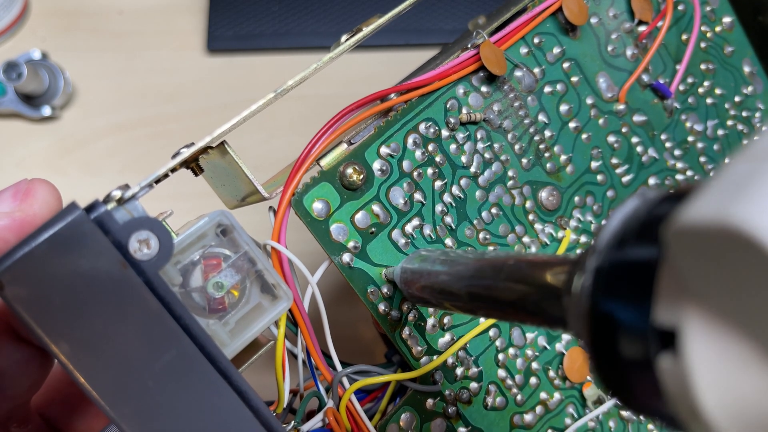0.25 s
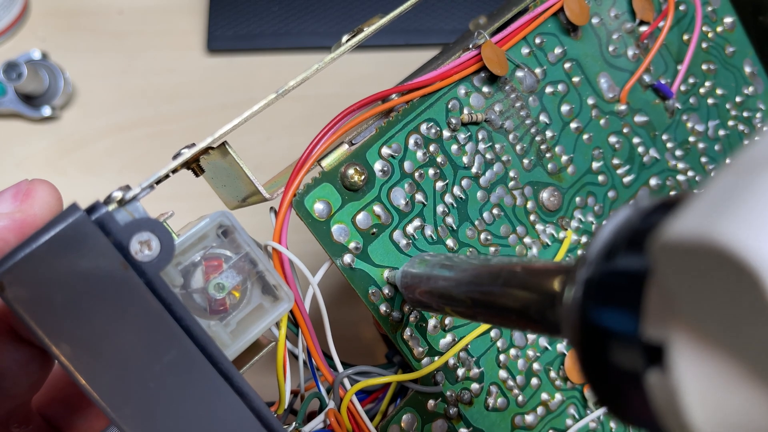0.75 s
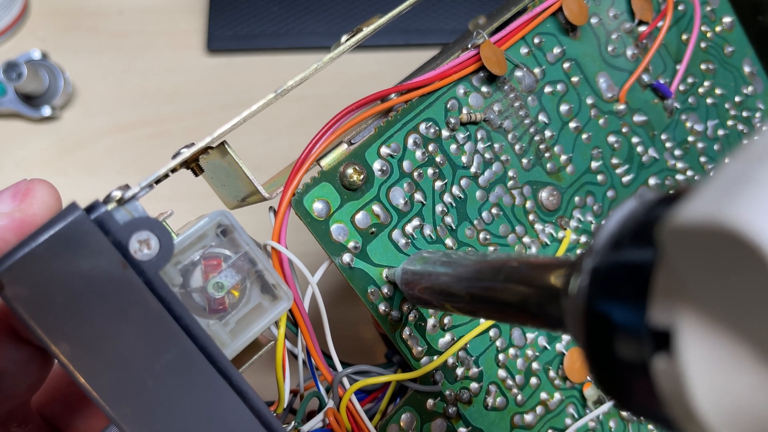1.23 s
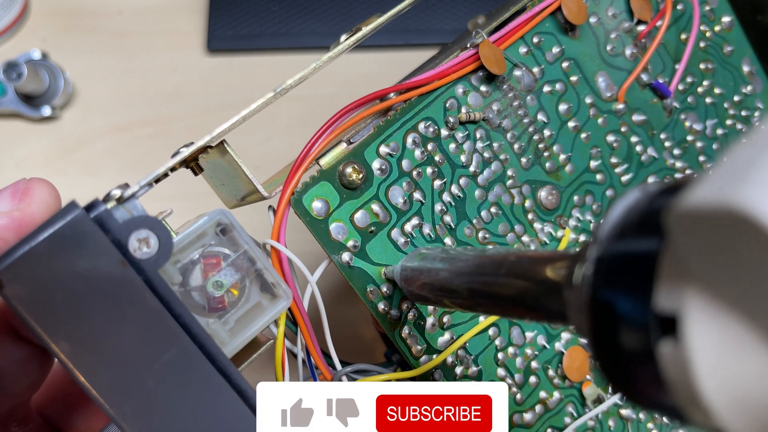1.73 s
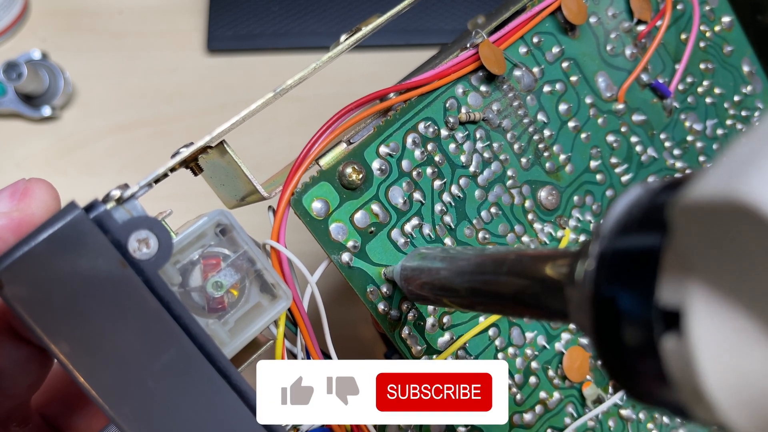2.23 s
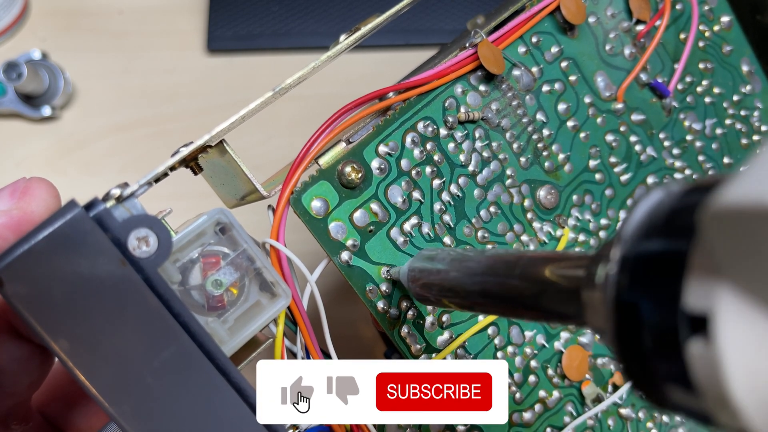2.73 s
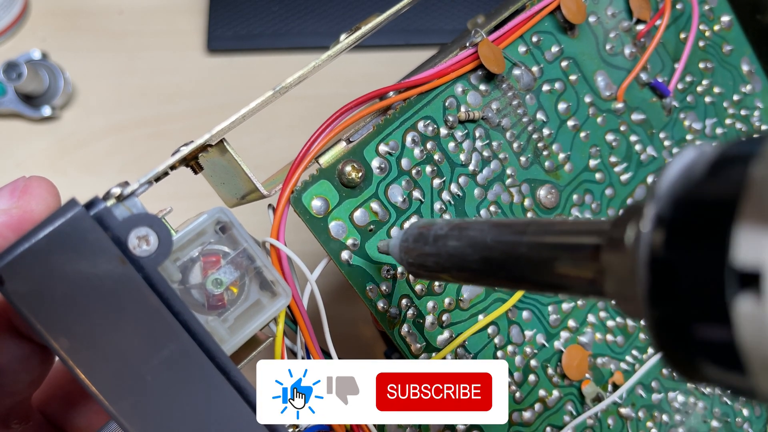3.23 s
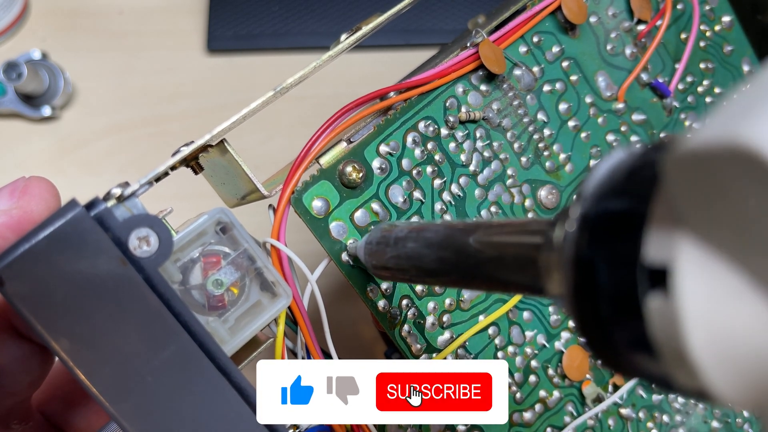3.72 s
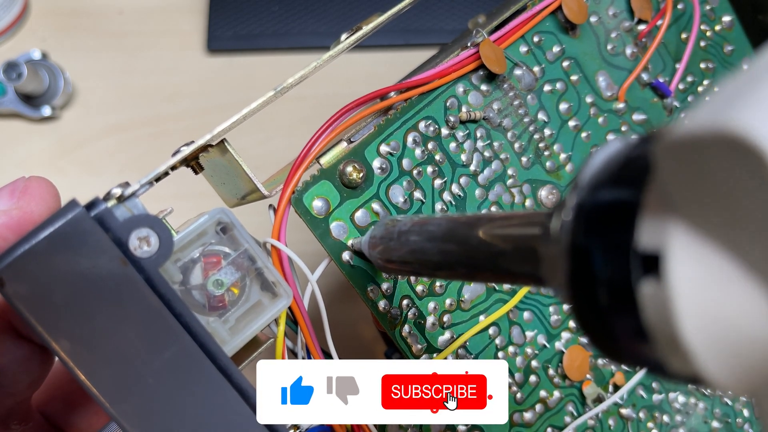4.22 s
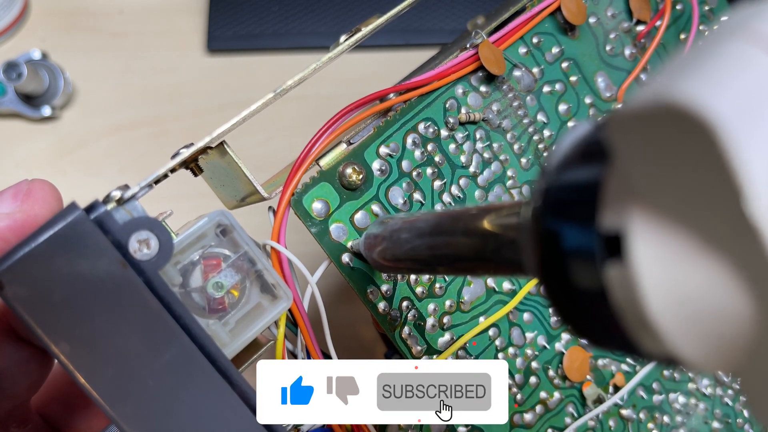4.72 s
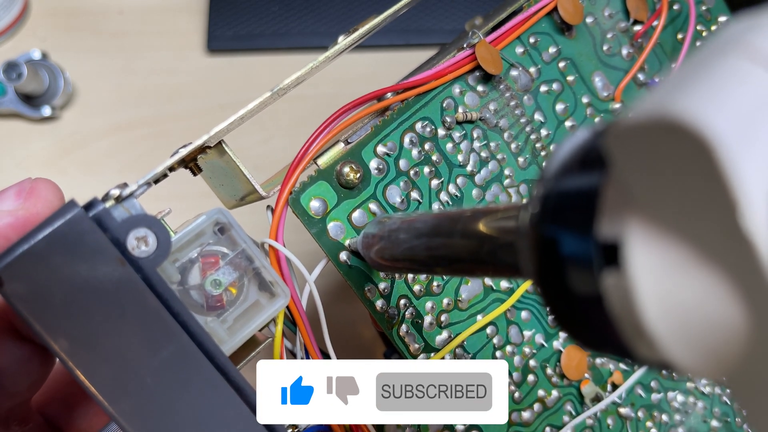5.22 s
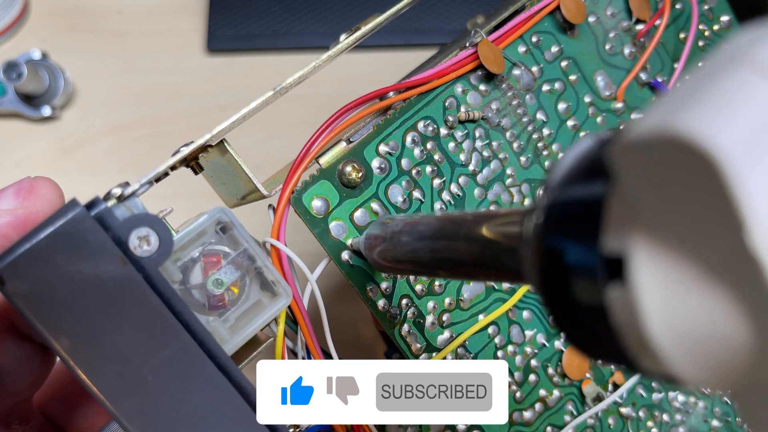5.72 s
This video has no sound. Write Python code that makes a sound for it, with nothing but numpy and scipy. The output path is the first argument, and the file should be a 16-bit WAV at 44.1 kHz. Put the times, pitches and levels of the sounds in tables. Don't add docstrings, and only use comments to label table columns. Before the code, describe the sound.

Close microphone at a workbench in a quiet, ventilated small room. A hot metal tip ticks and bumps a circuit board, then a plastic trigger clicks and a small diaphragm pump spins up, buzzing and sucking air with a whistly hiss. A louder click releases it and it quickly coasts down. Later the board clatters with rattling loose parts, more ticks follow, and flux fizzes faintly.

```python
import sys
import numpy as np
from scipy import signal
from scipy.fft import rfft, irfft
from scipy.io import wavfile

SR = 44100
rng = np.random.default_rng(int(sys.argv[2]) if len(sys.argv) > 2 else 0)


def to_wav(s):
    ch = np.atleast_2d(s).T
    pcm = np.round(np.clip(ch, -1, 1) * 32767)
    wavfile.write(sys.argv[1], SR, pcm.astype(np.int16))


def elevation(decibels):
    levels = np.asarray(decibels, float)
    return 10 ** (levels / 20)


N = 262703
BURST_N = int(0.3 * SR)


def rms_one(x):
    return x / np.sqrt(np.mean(x ** 2) + 1e-20)


def curve(rows):
    return np.interp(np.arange(N) / SR, *np.transpose(rows))


def coloured(spectrum):
    hz, db = np.transpose(spectrum)
    bins = np.maximum(np.fft.rfftfreq(N, 1 / SR), 1)
    shape = elevation(np.interp(np.log(bins), np.log(hz), db, -90, -90))
    return rms_one(irfft(rfft(rng.standard_normal(N)) * shape, N))


def drift(rate_hz):
    r = np.exp(-2 * np.pi * rate_hz / SR)
    wander = signal.lfilter([1], [1, -2 * r, r * r], rng.standard_normal(N + SR))
    return rms_one(wander[SR:])


def resonate(x, hz, width):
    r = np.exp(-np.pi * width / SR)
    poles = [1, -2 * r * np.cos(2 * np.pi * hz / SR), r * r]
    return signal.lfilter([(1 - r * r) / 2, 0, (r * r - 1) / 2], poles, x)


def ring(strikes, hz, t60):
    r, w = elevation(-60 / (t60 * SR)), 2 * np.pi * hz / SR
    return signal.lfilter([0, np.sin(w)], [1, -2 * r * np.cos(w), r * r], strikes + 1e-18)


def high(x, hz):
    return signal.sosfilt(signal.butter(4, hz, "high", fs=SR, output="sos"), x)


def add(out, s, sound):
    i = int(s * SR)
    out[i:i + len(sound)] += sound[:N - i]


def fade(t60, rise):
    t = np.arange(BURST_N) / SR
    return (1 - np.exp(-t / rise)) * elevation(-60 * t / t60)


def gate(edges_s, depth_db=30):
    return np.interp(np.arange(N) / SR, np.sort(edges_s), [-depth_db, 0, 0, -depth_db], -150, -150)


def swells(rows):
    t = np.arange(N) / SR
    return sum(elevation(db) * np.exp(-((t - middle) / half) ** 4) for middle, half, db in rows)


# [Hz, dB per Hz]
HUSH = [(8.8, -34), (15, 3), (25, -7.5), (59, -16), (109, -18), (130, -12.5), (150, -22.5), (240, -18),
        (442, -19.5), (705, -28), (1790, -30.5), (1960, -30), (2780, -35.5), (7720, -45), (16000, -48)]
# [Hz, dB, Hz]
DUCT = [(328.5, -67.5, 13), (245.2, -71.5, 16), (380.1, -68.5, 31), (187.1, -68.5, 17.6), (2024, -78, 37),
        (1082, -78.5, 76)]
# [s, dB]
HANDLING = [(0, 0.5), (1.0, 3.5), (1.4, 0.6), (3.0, -1.5), (4.2, -0.4), (4.6, 1.45), (5.96, 2.54)]
# [s, s, dB]
SHOVES = [(0.48, 0.071, -45), (0.68, 0.073, -45.5), (1.0, 0.19, -46), (1.76, 0.13, -44.5),
          (2.22, 0.22, -43.5), (2.9, 0.12, -48.5), (3.2, 0.16, -59), (4.12, 0.065, -54), (4.75, 0.071, -46),
          (5.82, 0.1, -48)]


def room_tone():
    blade_hz = 117 * (1 + 0.0129 * drift(3.37))
    blade = elevation(-64 + 0.56 * drift(3.3)) * np.sin(2 * np.pi * np.cumsum(blade_hz) / SR)
    white = rng.standard_normal(N)
    duct = sum(elevation(db) * rms_one(resonate(resonate(white, hz, width), hz, width)) for hz, db, width in DUCT)
    hush = elevation(-56) * coloured(HUSH)
    steady = high(hush, hz=5000)
    handled = elevation(curve(HANDLING)) * high(hush - steady, hz=11.7)
    bench = elevation(-3.0) * coloured([(5, 0.5), (14, 5.5), (32, -17.0), (60, -39.5)])
    rumble = (elevation(-62) + swells(SHOVES)) * bench
    return blade + duct + steady + handled + rumble


# [s, dB, Hz, dB, s]
TICKS = [(0.2886, -38, 2880, -5.5, 0.023), (0.405, -50.5, 7500, 4, 0.0075), (0.497, -34, 5000, -12, 0.011),
         (0.518, -48, 14500, -13, .01), (0.943, -42.5, 10700, -15, 0.0092), (1.024, -47, 7650, -12, .015),
         (1.241, -59, 5000, -6, .015), (2.958, -54, 3260, -1, 0.021), (4.521, -51, 5750, -2, 0.013),
         (5.121, -44, 6800, -15, .012)]


def tip_ticks():
    out = np.zeros(N)
    t = np.arange(BURST_N) / SR
    for s, peak_db, hz, share_db, t60 in TICKS:
        scrape = resonate(rng.standard_normal(BURST_N), hz=7450, width=11000)
        crack = fade(0.027, 0.00019) * high(scrape, hz=1800)
        tone = fade(t60, 0.000091) * np.sin(2 * np.pi * hz * t)
        add(out, s, elevation(peak_db) * (0.32 * crack + elevation(share_db) * tone))
    return out


# [s, dB, dB, Hz]
KNOCKS = [(0.389, -48.5, -49, 940), (0.528, -51, -43, 990), (0.616, -54, -44.5, 1980),
          (4.52, -42, -62, 1390), (4.659, -48, -43, 1900), (4.682, -35, -33, 940), (4.693, -49, -41, 1300),
          (4.701, -30.5, -27, 920), (4.708, -50, -34, 3300), (4.713, -37, -32, 1190),
          (4.729, -45, -32.5, 4120), (4.744, -48, -37, 3100), (4.776, -48, -36, 940),
          (4.792, -58, -42, 1300), (4.805, -60, -40, 1180), (5.121, -43, -57, 2050),
          (5.27, -39.5, -48.5, 1480), (5.297, -52, -42.5, 1800)]
# [Hz, dB, s]
BOARD = [(146.4, -5.5, 0.16), (211, 0.5, 0.095), (235, 2.5, 0.097), (326, 10.5, 0.085), (383, -16, 0.067),
         (532, 4.5, 0.032), (784, 6.5, 0.051)]
# [Hz, dB per Hz]
RATTLE = [(400, -49), (700, -1), (1030, 8), (1450, 3.5), (2000, 1), (2600, -3), (3270, 1.5), (4400, -5.5),
          (4750, -14), (9930, -17), (15000, -46)]


def knocks():
    out = np.zeros(N)
    rattle = coloured(RATTLE) * elevation(3.5 * drift(200))
    push = fade(0.013, 0.00048)
    push = push / push.sum()
    for s, rattle_db, thud_db, part_hz in KNOCKS:
        share = elevation(rng.normal(0, 2, len(BOARD))) * rng.choice([-1, 1], len(BOARD))
        thud = sum(g * elevation(db) * ring(push, hz, t60) for g, (hz, db, t60) in zip(share, BOARD))
        part = rms_one(resonate(rng.standard_normal(BURST_N), part_hz, width=320))
        loose = rattle[int(s * SR):][:BURST_N] + elevation(1) * part
        burst = fade(t60=0.091, rise=0.003) * loose
        add(out, s, elevation(rattle_db - 8.5) * burst + elevation(thud_db + 1.0) * high(thud, hz=85))
    return out


def bench_echo(x):
    tail = fade(0.088, 0.0059) * rng.standard_normal(BURST_N)
    return signal.fftconvolve(x, tail / np.sqrt(np.sum(tail ** 2)))[:N]


# [s, dB]
TRIGGER = [
    (1.4311, -27.5),
    (2.7167, -22.5),
]
# [Hz, dB, s]
PRESS = [(1850, -11, 0.021), (2170, -1, .008), (3300, -10, 0.004), (5140, -4, 0.01), (5820, 4, 0.0076),
         (7140, 1, 0.0043), (8600, 0.5, 0.0032), (10900, 15.5, 0.0012), (15000, -2, .008)]
# [Hz, dB, s]
RELEASE = [(1860, -6, 0.016), (2720, -17, 0.0077), (3500, -15, .007), (4840, -16, 0.023),
           (5270, -11, 0.0059), (6330, -6, 0.021), (8000, -9, 0.0048), (9200, 3, 0.0041),
           (10700, 6, 0.0063), (13800, 2, 0.0041), (14950, 2, 0.005)]


def trigger():
    out = np.zeros(N)
    for (s, peak_db), modes in zip(TRIGGER, (PRESS, RELEASE)):
        snap = fade(0.0055, 0.0006) * rng.standard_normal(BURST_N)
        body = sum(elevation(db) * ring(snap, hz, t60) for hz, db, t60 in modes)
        click = body / np.abs(body).max() + 0.22 * snap
        add(out, s, elevation(peak_db + 3.5) * high(click, hz=1680))
    return out


PUMP_SPAN = slice(int(1.4 * SR), int(2.9 * SR))
FULL_SPEED = 82.5
# [s, turns per s]
SPEED = [(1.46, 40), (1.49, 56), (1.514, 71), (1.57, 79), (1.646, 82.9), (1.95, 83.8), (2.414, 83.9),
         (2.722, 84.7)]


def motor():
    coasting_s = np.maximum(np.arange(N) / SR - SPEED[-1][0], 0)
    crawl = 54 * (coasting_s > 0)
    speed = np.maximum(curve(SPEED) - 500 * coasting_s, crawl)[PUMP_SPAN]
    turn = 2 * np.pi * np.cumsum(speed * (1 + 0.0005 * drift(25)[PUMP_SPAN])) / SR
    return speed, turn


# [Hz, dB per Hz]
AIR = [(250, -1.5), (450, -11), (1170, -11.5), (1900, -12), (2360, -9.5), (2880, -16.5), (5000, -17),
       (8600, -19), (9800, -18.5), (11000, -20.5), (11800, -23), (15800, -21.5), (16500, -40)]
# [Hz, Hz, dB]
WHISTLES = [(3100, 77, -3), (6890, 42, -1), (7950, 280, -8), (8600, 150, -3), (8940, 72, -16),
            (10960, 100, -7)]


def nozzle_air(turn):
    t = np.arange(N) / SR
    air, waver = coloured(AIR), drift(16)
    whistle = 0
    for hz, width, db in WHISTLES:
        flutter_db = 2.5 * np.roll(waver, 3 * int(hz))
        whistle = whistle + elevation(db + 5.5 + flutter_db) * resonate(air, hz, width)
    air = rms_one(air + whistle)
    vent = (t > SPEED[-1][0]) * elevation(3.5) * high(air[::-1], hz=7550)
    gulp_db = 6.5 * np.exp(-((t - 1.593) / 0.021) ** 2)
    pull_db = 1.7 * 20 * np.log10(curve(SPEED) / FULL_SPEED)
    gust_db = 0.6 * drift(12)
    out = elevation(-53.5 + gate((1.445, 1.47, 2.793, 2.84)) + pull_db + gulp_db + gust_db) * (air + vent)
    out[PUMP_SPAN] *= 1 + 0.086 * np.sin(turn) + 0.048 * np.sin(2 * turn + 2.3)
    return out


DRONE_TONES_DB = (-14, 0, -8, -15, -15)


def diaphragm_drone(speed, turn):
    drone = sum(elevation(DRONE_TONES_DB[k - 1] + 0.5 * drift(36)[PUMP_SPAN]) * np.sin(k * turn + 0.318 * k * k)
                for k in range(1, 6))
    mount_db = 7 * np.exp(-((speed - 66.5) / 8.1) ** 2)
    push_db = 3 * 20 * np.log10(speed / FULL_SPEED)
    return elevation(-45 + gate((1.466, 1.5, 2.79, 2.87))[PUMP_SPAN] + push_db + mount_db) * drone


SLAP_EDGES_S = (1.458, 1.471, 2.735, 2.83)
RINGING = (6, 9, 10, 11, 12, 13, 17, 18, 27, 28, 29, 30, 31)
RINGING_DB = (-20, -5, -19, -8, -12, -13, -17, -18, -7.5, -7, -5.5, -19, -12)


def valve_slaps(speed, turn):
    multiple = np.arange(33)
    housing_db = np.full(33, -24.0)
    housing_db[-1] = -43
    housing_db[list(RINGING)] = RINGING_DB
    slowed = np.minimum(speed / FULL_SPEED, 1)
    flutter = [elevation(1.1 * drift(6)[PUMP_SPAN]) for _ in range(5)]
    slap = 0
    for k in range(6, 62):
        level = elevation(np.interp(k * slowed, multiple, housing_db, right=-70))
        slap = slap + level * flutter[k % 5] * np.sin(k * turn - 0.65 * k * k)
    t = np.arange(N)[PUMP_SPAN] / SR
    extra_db = 3.5 * np.exp(-(t - SPEED[0][0]) / 0.3)
    force_db = 2.6 * 20 * np.log10(speed / FULL_SPEED)
    slap = elevation(-47 + gate(SLAP_EDGES_S)[PUMP_SPAN] + force_db + extra_db) * slap
    strokes = np.diff(turn // (2 * np.pi), prepend=0) * np.clip(12 * (1 - slowed), 0, 1)
    lid_level = elevation(-46 + gate(SLAP_EDGES_S, depth_db=18)[PUMP_SPAN])
    return slap + ring(strokes * lid_level, hz=2390, t60=0.03)


def pump():
    speed, turn = motor()
    out = nozzle_air(turn)
    out[PUMP_SPAN] += diaphragm_drone(speed, turn) + valve_slaps(speed, turn)
    return out


# [s, s, dB]
SPURTS = [(3.1, 0.18, -77), (3.45, 0.13, -74.5), (4.0, 0.037, -74), (5.15, .06, -76), (5.87, 0.12, -65.5)]


def sizzle():
    grains = rng.standard_normal(N) * elevation(2.2 * rng.exponential(1, N))
    return swells(SPURTS) * rms_one(resonate(grains, hz=8500, width=9900))


def scene():
    hits, switch = tip_ticks() + knocks(), trigger()
    echo = bench_echo(elevation(-12) * hits + elevation(-22) * switch)
    return (room_tone() + hits + switch + echo + pump() + sizzle())[None]


def band_limit(x):
    return signal.sosfilt(signal.butter(12, 16800, fs=SR, output="sos"), x)


def record(dry):
    edge = signal.ellip(10, 0.5, 32, 15740, fs=SR, output="sos")
    mix = signal.sosfilt(edge, dry)
    return band_limit(mix)


dry = scene()
out = record(dry)
to_wav(out)
```